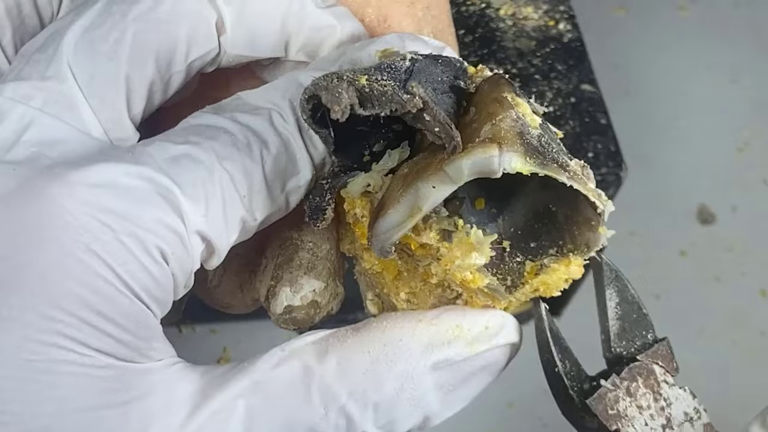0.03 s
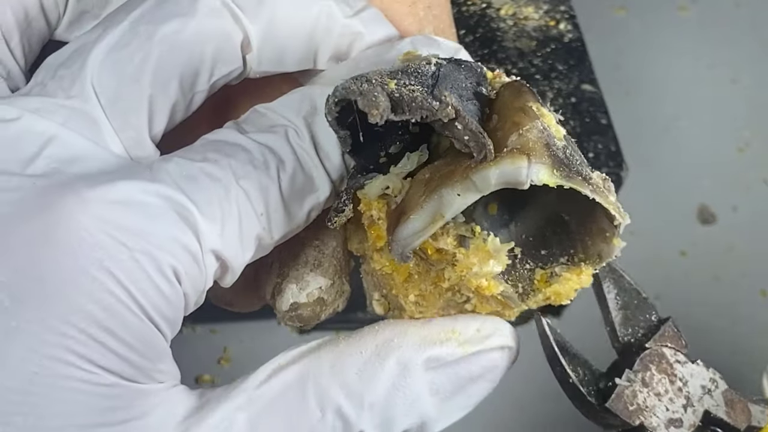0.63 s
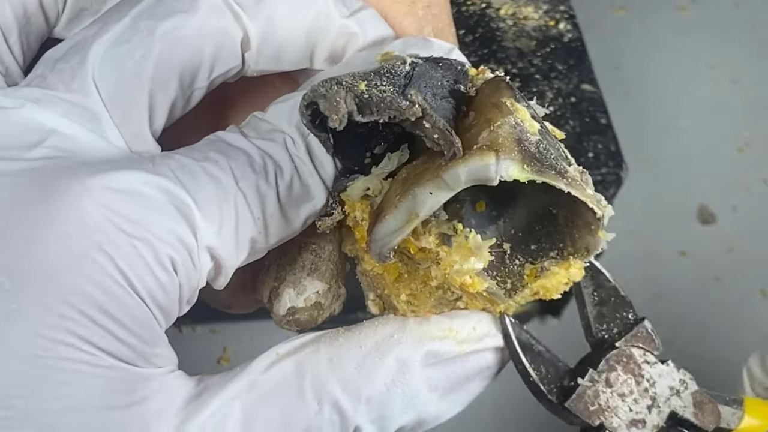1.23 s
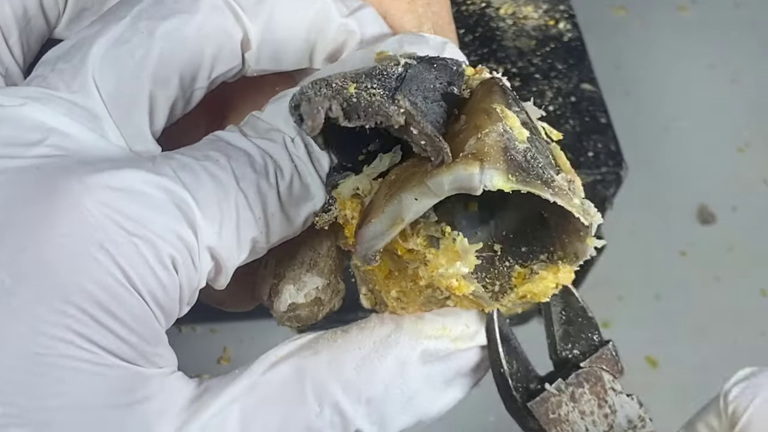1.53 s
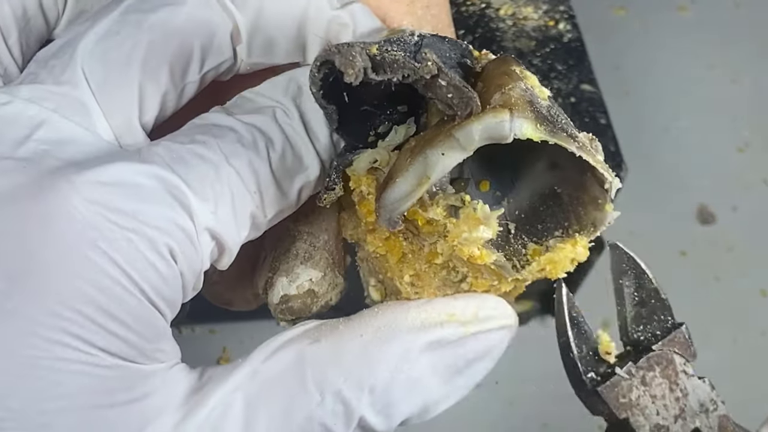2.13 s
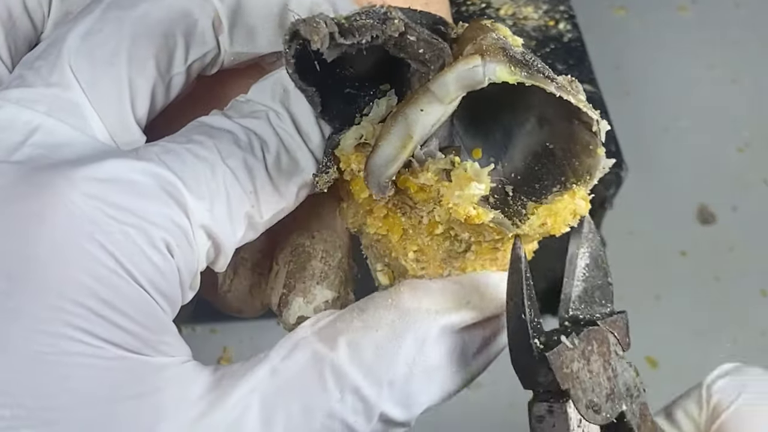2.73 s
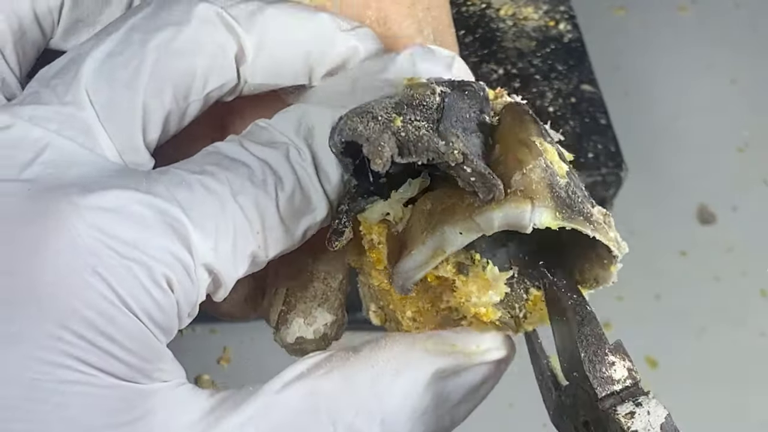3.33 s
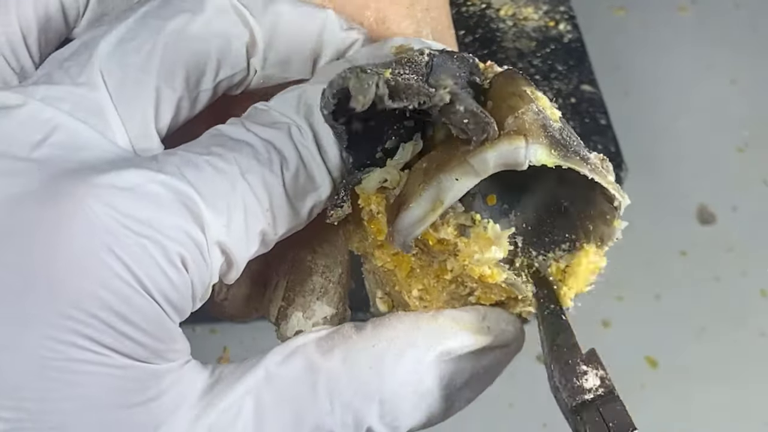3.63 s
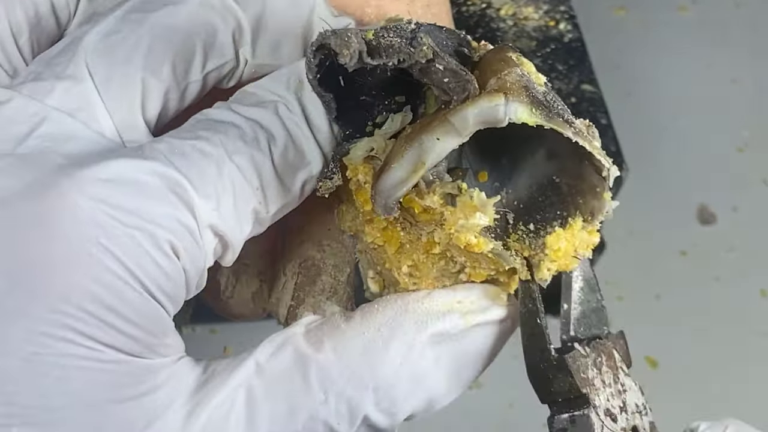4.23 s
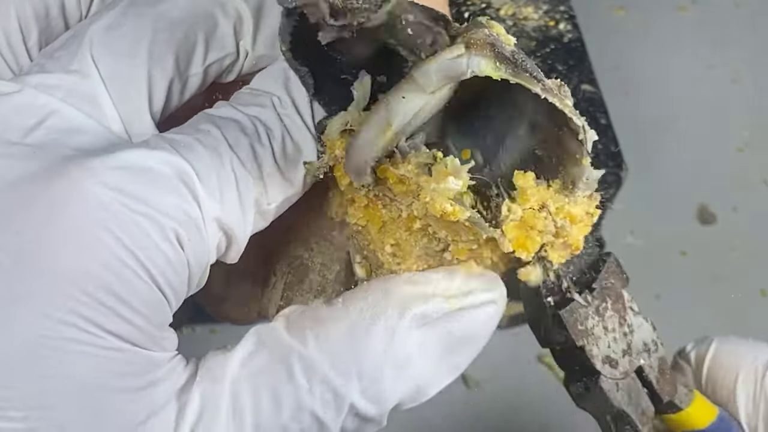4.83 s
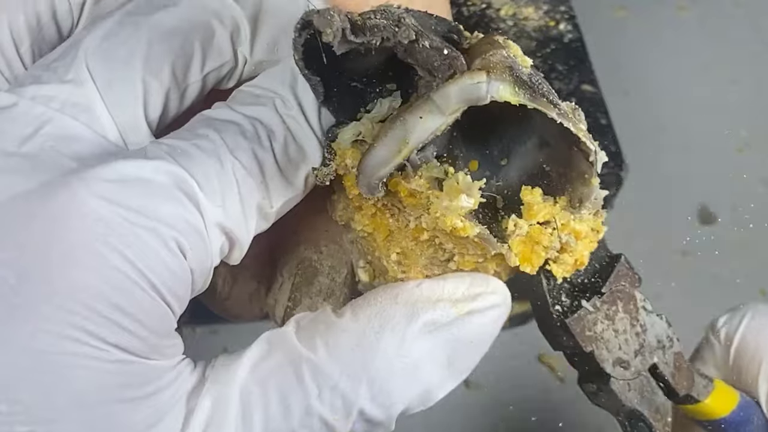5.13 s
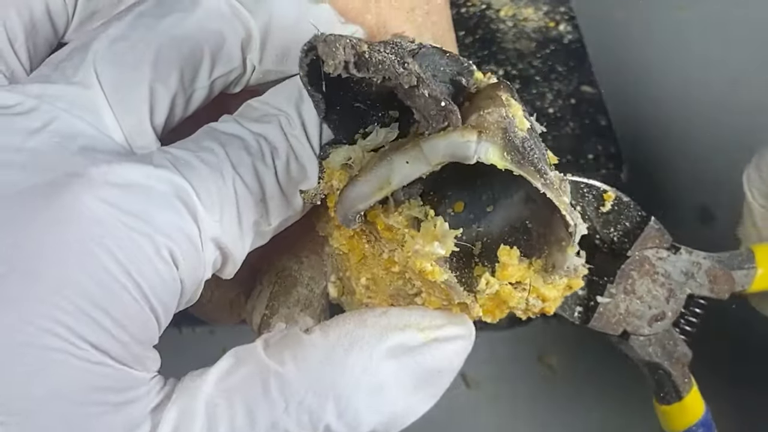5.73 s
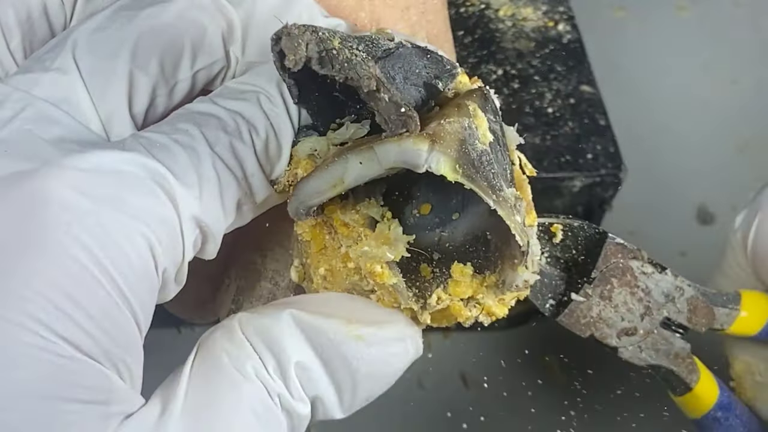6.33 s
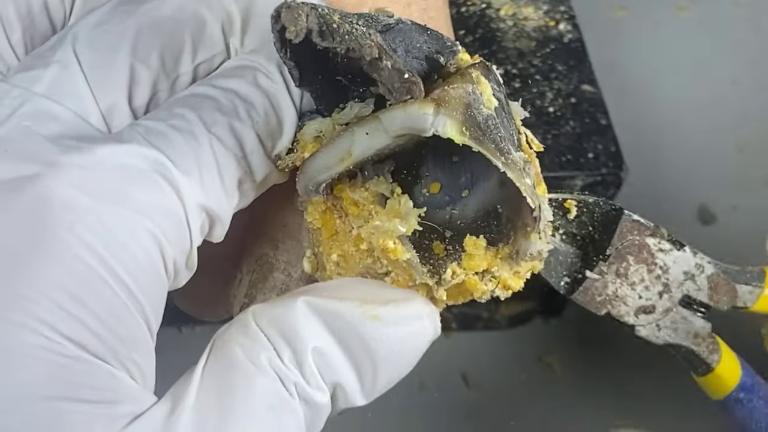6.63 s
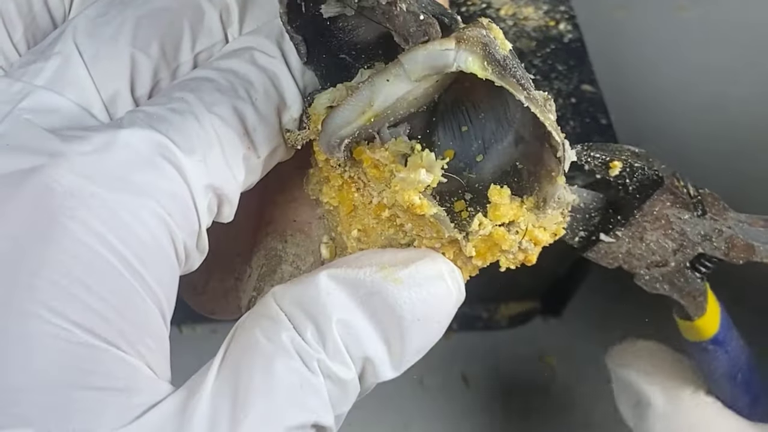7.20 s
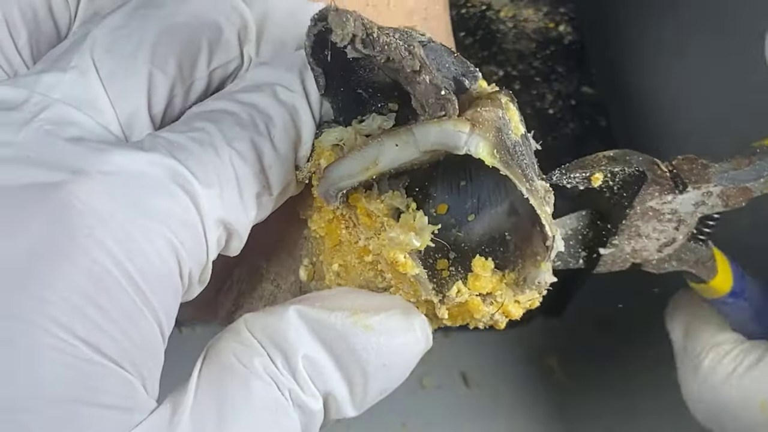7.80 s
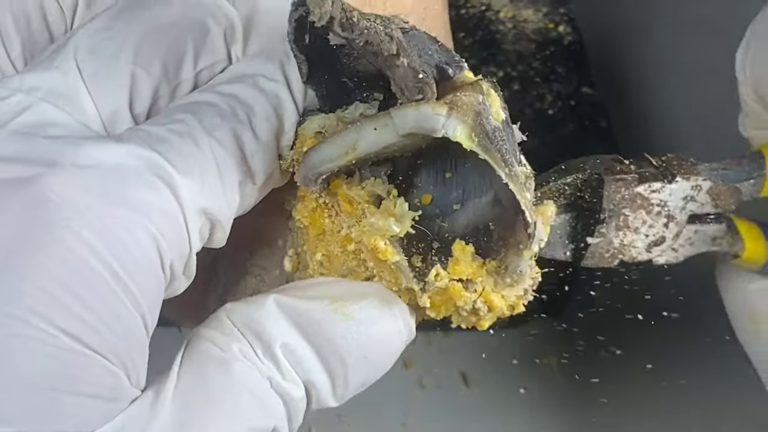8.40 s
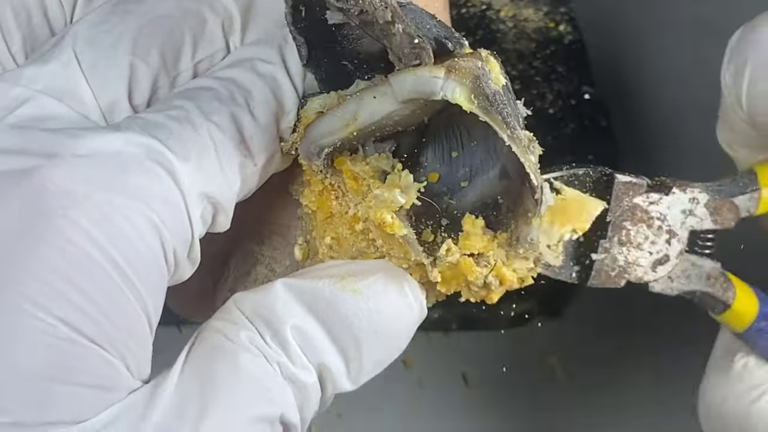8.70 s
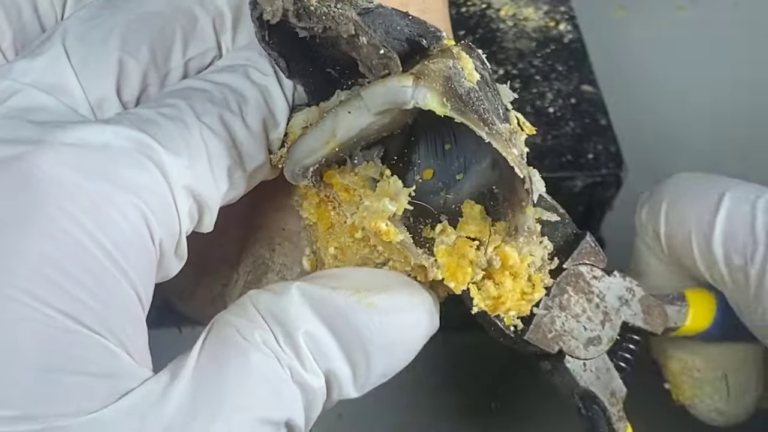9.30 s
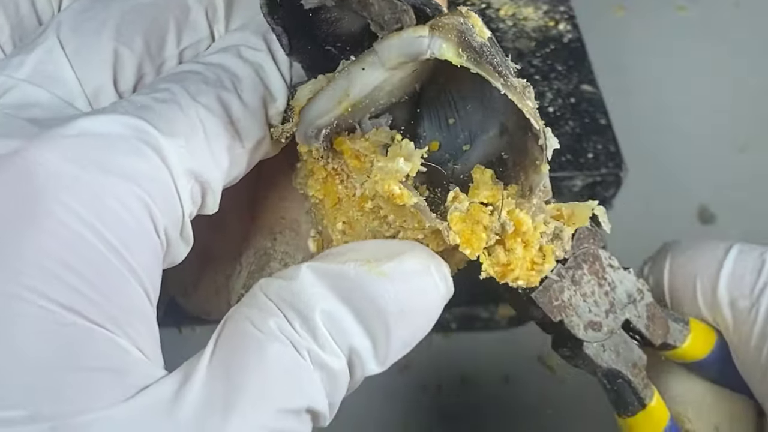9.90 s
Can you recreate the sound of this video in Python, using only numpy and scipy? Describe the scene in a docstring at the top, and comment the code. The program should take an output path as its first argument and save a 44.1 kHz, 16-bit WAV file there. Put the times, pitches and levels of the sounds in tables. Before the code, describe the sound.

Steel nippers cut a thick, hard toenail close to the microphone in a small room. Sharp, crackling snaps come every second or two, the loudest about halfway through, and a few end in a tiny metallic clink. Between cuts the blades tick and scrape on the nail, a glove rubs softly, and the jaws give one short creak near the end. A ventilation fan hums low throughout.

```python
"""Steel nippers cut a thick, hard toenail close to the microphone.
Each cut is a quick run of fractures that ring the jaws and the nail; after some cuts the blades clash.
Between cuts the blades scrape, tick, judder and creak on the nail, and a gloved hand shifts its grip.
The small room adds a short echo, and a ventilation fan hums throughout."""
import sys
import numpy as np
from scipy import signal
from scipy.fft import rfft, irfft, next_fast_len
from scipy.io import wavfile
from scipy.ndimage import map_coordinates

SR = 44100
rng = np.random.default_rng(int(sys.argv[2]) if len(sys.argv) > 2 else 0)


def transcribe(signal):
    """Save signal, clipped to [-1, 1], as a 16-bit WAV file at the path in sys.argv[1]."""
    frames = np.atleast_2d(signal).T
    limited = np.clip(frames, -1, 1)
    pcm = np.round(limited * 32767).astype(np.int16)
    wavfile.write(sys.argv[1], SR, pcm)


N = 438794
TIME = np.arange(N) / SR
SIDES = np.array([[1], [-1]]) / 2  # plus half on the left, minus half on the right


def amp(db):
    """Turn decibels into a gain."""
    return 10 ** (np.asarray(db) / 20)


def unit(x):
    """Scale a signal to an average (rms) level of 1."""
    return x / np.sqrt(np.mean(x ** 2) + 1e-20)


def along(points, hz):
    """Read between (frequency, value) points on a log frequency axis."""
    freqs, values = np.transpose(points)
    return np.interp(np.log(hz + 1), np.log(freqs + 1), values)


def wobble(rate):
    """A smooth curve through `rate` random values a second."""
    return map_coordinates(rng.standard_normal(int(N * rate / SR) + 4), [TIME * rate])


def swell(middle, half):
    """A bell-shaped rise and fall; both settings are in seconds."""
    return np.exp(-np.minimum(((TIME - middle) / half) ** 2, 100) / 2)


def add(track, s, sound):
    """Lay a sound into a track at s seconds."""
    start = round(s * SR)
    track[start:start + len(sound)] += sound[:N - start]


def filtered(x, response):
    """Change the strength and phase of each frequency by response(hz)."""
    n = x.shape[-1]
    padded = next_fast_len(n + n // 8, True)
    hz = np.fft.rfftfreq(padded, 1 / SR)
    return irfft(rfft(x, padded) * response(hz), padded)[..., :n]


def ring(x, modes):
    """Shake a body with x: it rings at its modes, the pitches it favours."""
    def response(f):
        return sum((-1) ** k * amp(db) * 1j * f * width / (hz * hz - f * f + 1j * f * width)
                   for k, (hz, width, db) in enumerate(modes))
    return filtered(x, response)


def burst(modes, rise, span):
    """A brief tear peaks at `rise` seconds and rings a body, with the energy of `span` seconds at rms 1."""
    t = np.arange(SR // 40) / SR
    tear = rng.standard_normal(len(t)) * (t / rise) ** 2 * np.exp(-2 * t / rise)
    sound = ring(tear, modes)
    return sound / np.linalg.norm(sound) * np.sqrt(span * SR)


def ping(modes, span):
    """A sudden release: the modes swell and die quickly, with the energy of `span` seconds at rms 1."""
    sound = ring(ring(signal.unit_impulse(SR // 40), modes), modes)
    return sound / np.linalg.norm(sound) * np.sqrt(span * SR)


# how alike left and right are: (frequency [Hz], likeness [0 to 1])
LIKENESS = [(60, 0.54), (130, 0.79), (290, 0.67), (640, 0.044), (1400, 0.028), (2400, 0.81), (4000, 0.98),
            (15000, 1)]
def diffuse(pair):
    """Blend two unrelated signals into sound that arrives from all sides."""
    def shares(hz):
        angle = np.arccos(np.clip(along(LIKENESS, hz), -1, 1)) / 2
        return np.array([np.cos(angle), np.sin(angle)])
    mid, side = filtered(pair, shares)
    return np.array([mid + side, mid - side])


# the fan's tones: (pitch [Hz], level [dB], waver [dB], left over right [dB])
HUM_TONES = [(65.93, -18.6, .3, 1.65), (197.85, -35, 2, 5)]
def fan_hum():
    """The fan hums deeply, wavering a little in level and pitch."""
    hum = np.zeros((2, N))
    for hz, db, waver, pan in HUM_TONES:
        gain = np.sqrt(2) * amp(db + waver * wobble(7) + SIDES * pan)
        hum += gain * np.sin(2 * np.pi * hz * TIME + waver / 12 * wobble(3))
    return hum


# the tone colour of moving air: (frequency [Hz], relative level [dB])
AIR_COLOUR = [(15, -67), (45, 3), (85, 7), (165, -9), (310, -2.4), (500, -7.5), (850, -10), (1400, -16),
              (2000, -18), (2600, -19.5), (3200, -25.5), (4000, -27), (4700, -29.5), (7000, -37),
              (12000, -41.5), (15500, -43.5)]
# the air duct's modes: (pitch [Hz], width [Hz], relative level [dB])
DUCT_MODES = [(101.2, 6.2, -1.5), (110.3, 7.3, -0.5), (134.3, 7.2, -5), (198.7, 6.8, -2), (265.8, 6, -4),
              (298, 8.2, -13), (337.4, 6, -10.5), (400.5, 4.7, -7.5), (601.6, 7.5, -11.5)]
def fan_air(air_db, duct_db, ripple_db=2.3, ripple_step_hz=16, echo_s=.00379, echo_share=.14):
    """Air rushes through a ringing duct, a little to the left."""
    def colour(hz):
        # the room's standing waves ripple the colour, and one close reflection joins in
        ripple = np.interp(hz / ripple_step_hz, np.arange(SR // 20), rng.standard_normal(SR // 20))
        reflection = echo_share * np.exp(-2j * np.pi * hz * echo_s)
        return amp(along(AIR_COLOUR, hz) + ripple_db * ripple) * (1 + reflection)
    air = unit(filtered(rng.standard_normal((2, N)), colour))
    duct = unit(ring(rng.standard_normal((2, N)), DUCT_MODES))
    waver_db = .25 * wobble(2.75) + .35 * wobble(14)
    rush = diffuse(amp(air_db + waver_db) * air + amp(duct_db) * duct)
    left_over_right_db = [(100, 6.0), (220, 2.6), (1300, 3.7), (4400, .2)]
    return filtered(rush, lambda hz: amp(SIDES * along(left_over_right_db, hz)))


# the fan's whistles: (pitch [Hz], middle time [s], half length [s], relative level [dB])
WHISTLES = [(883, .8, .5, -52), (883, 2.4, .3, -51), (883, 3.15, .2, -45), (786, 6.15, .45, -47)]
def fan_whistles(gain_db):
    """Faint, unsteady whistles come and go."""
    out = np.zeros(N)
    for hz, s, half, db in WHISTLES:
        gain = amp(db + gain_db + 1.2 * wobble(4.22)) * swell(s, half)
        out += gain * np.sin(2 * np.pi * hz * TIME + 0.79 * wobble(12))
    return out


# blade strokes: (middle time [s], half length [s], level [dB], jaw and crumb boost [dB])
STROKES = [(.448, .025, -57, -8), (1.49, 0.047, -55, -10), (3.555, 0.014, -38, 0),
           (3.685, 0.015, -31.5, -8), (3.764, .023, -55, 0), (6.037, 0.007, -47.5, -1),
           (6.143, .014, -52, -14), (6.28, 0.01, -38, -5), (7.565, 0.058, -51, -4), (8.153, 0.0025, -44, 0),
           (8.211, 0.036, -52.5, -6), (8.338, .003, -39, 2), (9.538, 0.0095, -44.5, 6.5)]
# modes of cracking nail, jaws and nail crumbs: (pitch [Hz], width [Hz], relative level [dB])
CRACK_MODES = [(4730, 1200, -3), (6950, 1700, 1), (9800, 2100, 1.5), (11730, 1700, -2), (13900, 2100, -1.5)]
JAW_MODES = [(5720, 1100, 1)]
CRUMB_MODES = [(2470, 530, 1), (3200, 510, 1.5), (4200, 1500, -0.5)]
def scrapes(grain_db, crumb_db, jaw_db):
    """The blade shaves crumbly nail: countless tiny breaks swell and fade with each stroke."""
    crack_gain, body_gain = np.zeros((2, N))
    for s, half, db, body_db in STROKES:
        stroke = amp(db) * swell(s, half)
        crack_gain += stroke
        body_gain += stroke * amp(body_db)
    grains = rng.standard_normal((3, N)) * amp(grain_db * wobble(700))
    cracks = unit(ring(grains[0], CRACK_MODES))
    jaws = amp(jaw_db) * unit(ring(grains[1], JAW_MODES))
    crumbs = amp(crumb_db) * unit(ring(grains[2], CRUMB_MODES))
    return crack_gain * cracks + body_gain * (jaws + crumbs)


# touches of the blade tips: (time [s], relative level [dB])
TOUCHES = [(1.4481, -31), (2.768, -38), (2.83, -37), (3.0653, -29.5), (3.283, -41.5), (3.558, -27),
           (3.935, -41.5), (4.09, -41), (4.845, -36), (5.9482, -36), (5.9577, -33), (5.9652, -31),
           (5.9752, -29.5), (6.1512, -33), (6.2245, -28), (6.2845, -26.5), (6.8269, -37), (6.985, -29.5),
           (7.11, -37), (7.549, -38), (7.566, -33), (7.574, -37), (7.6, -38), (7.608, -39), (7.644, -30.5),
           (7.7138, -27), (7.7215, -34), (7.777, -35), (7.87, -30.5), (8.149, -21.5), (8.219, -35),
           (8.7535, -32.5), (8.87, -39), (9.183, -37.5), (9.5184, -32), (9.5397, -27.5)]
def ticks(crack_db, jaw_db, catches_per_stroke=3, catch_db=-39.5):
    """Tiny bright clicks: the tips touch the nail, or the edge catches during a stroke."""
    catches = [(s + half * offset, catch_db)
               for s, half, *_ in STROKES for offset in rng.standard_normal(catches_per_stroke)]
    out = np.zeros(N)
    for s, db in list(TOUCHES) + catches:
        add(out, s, amp(db + crack_db) * burst(CRACK_MODES, rise=0.0007, span=0.0046))
        add(out, s, amp(db + jaw_db) * ping(JAW_MODES, span=0.0015))
    return out


# breaks in the nail: (time [s], crack [dB], edge ring [dB], jaw ring [dB], jaw pitch [Hz],
# piece ring [dB], piece pitch [Hz], hollow ring [dB], toe knock [dB], foot thud [dB])
FRACTURES = [(1.8028, -24.5, -30, -33, 6030, -42, 3980, -50, -48, -38),
             (1.8057, -28, -31, -25, 5300, -34, 2580, -44, -49, -37),
             (1.8078, -21.5, -26, -25.5, 6450, -27, 3210, -45, -40, -40.5),
             (1.8093, -29, -23, -19.5, 5400, -20.5, 2580, -41, -38, -35),
             (3.4858, -28, -39, -41, 6000, -37, 3300, -48, -43, -35),
             (3.4904, -28, -46, -25, 5200, -22.5, 3330, -50, -42, -33),
             (3.6679, -28, -30, -36, 5600, -32, 3500, -50, -45, -44),
             (3.6706, -28, -32, -33, 6300, -34, 3040, -48, -45, -43),
             (3.7013, -19.5, -33, -14.5, 5560, -38, 2260, -45, -37, -34),
             (4.6986, -29, -45, -28, 6300, -23, 2560, -50, -40, -46),
             (4.707, -34, -45, -32, 6300, -27, 2520, -52, -44, -48),
             (4.9022, -14, -21, -19, 5650, -24, 2700, -28, -23, -31),
             (4.9056, -15, -17, -20, 5250, -13.5, 2470, -18.5, -24, -28.5),
             (4.9075, -21, -24, -17, 5600, -18, 2820, -22, -27, -27),
             (4.9102, -8.5, -13, -15.5, 5730, -19, 2480, -29, -30, -27),
             (4.9131, -19, -23.5, -21, 5200, -24, 2360, -25, -27, -25),
             (4.9173, -13.5, -13, -10, 5570, -23, 2390, -26, -31.5, -24),
             (6.207, -27, -25, -32, 6800, -23, 3380, -41, -31, -41),
             (6.2094, -19.5, -23, -25, 4300, -19.5, 2580, -33, -18, -42),
             (6.2135, -21, -17.5, -28, 5040, -32, 3700, -36, -23, -44),
             (8.3353, -36, -44, -41, 5700, -39, 3280, -44, -38, -40),
             (8.3411, -24, -34, -35, 5600, -36, 2500, -42, -36, -32),
             (8.343, -23, -34, -26, 5600, -24.5, 3630, -38, -30.5, -31),
             (8.3463, -25, -37, -19, 5570, -30, 3170, -40, -34, -31),
             (8.3505, -31, -47, -26, 5660, -36, 2480, -42, -34, -31),
             (9.7367, -31.5, -49, -18.5, 5800, -24, 2460, -44, -36, -36)]
# modes of the piece that breaks off: (pitch [times piece pitch], width [Hz], relative level [dB])
PIECE_MODES = [(1, 560, 19), (1.25, 900, -10), (1.6, 1120, 0.5)]
# modes of the cutting edges, hollow nail, toe and foot: (pitch [Hz], width [Hz], relative level [dB])
EDGE_MODES = [(12550, 2400, 0)]
HOLLOW_MODES = [(1760, 200, 1), (2410, 260, -2), (3020, 240, -4)]
TOE_MODES = [(1104, 156, -1.5), (1284, 113, 1), (1684, 100, -6)]
FOOT_MODES = [(512, 120, 4), (790, 290, -0.5)]
def snaps(jaw_width_hz, fibre_db=-8, fibre_lead_s=.002):
    """Each fracture cracks, rings the steel and the nail, knocks the toe and jolts the foot."""
    out = np.zeros(N)
    for s, crack_db, edge_db, jaw_db, jaw_hz, piece_db, piece_hz, hollow_db, toe_db, foot_db in FRACTURES:
        piece = [(multiple * piece_hz, width, db) for multiple, width, db in PIECE_MODES]
        add(out, s, amp(crack_db) * burst(CRACK_MODES, rise=0.00051, span=0.0011))
        add(out, s, amp(edge_db) * ping(EDGE_MODES, span=0.0008))
        add(out, s, amp(jaw_db) * ping([(jaw_hz, jaw_width_hz, 0)], span=0.0015))
        add(out, s, amp(piece_db) * ping(piece, span=0.00088))
        add(out, s, amp(hollow_db) * ping(HOLLOW_MODES, span=0.0021))
        add(out, s, amp(toe_db) * burst(TOE_MODES, rise=0.00041, span=0.0026))
        add(out, s, amp(foot_db) * burst(FOOT_MODES, rise=0.00041, span=0.0037))
        # fibres start to give way just before the break
        fibres = burst(CRACK_MODES, rise=0.0024, span=0.0022)
        add(out, s - fibre_lead_s, amp(crack_db + fibre_db) * fibres)
    return out


# the blades meet after a clean cut: (time [s], level [dB], pitch [Hz])
CLASHES = [(3.7009, -30, 5560), (8.3463, -32, 5350), (9.7366, -34, 5690)]
# modes of the steel: (pitch [times clash pitch], relative level [dB])
STEEL_MODES = [(.955, -4), (1, 0), (1.05, -4), (1.82, -7)]
def clashes(ring_s):
    """The blades meet and the steel sings; the hand damps it by 60 dB in ring_s seconds."""
    out = np.zeros(N)
    t = np.arange(SR // 8) / SR
    for s, db, hz in CLASHES:
        for multiple, mode_db in STEEL_MODES:
            fade = amp(db + mode_db - 60 * t / ring_s)
            add(out, s, fade * np.sin(2 * np.pi * multiple * hz * t))
    return out


# shifts of the hand: (middle time [s], half length [s], level [dB])
GRIP_SHIFTS = [(5.55, 0.027, -45), (5.974, 0.03, -44.5), (7.25, .1, -51.5), (9.05, 0.11, -48),
               (9.273, 0.058, -43.5)]
# modes of the rubbing glove: (pitch [Hz], width [Hz], relative level [dB])
GLOVE_MODES = [(1900, 800, 0.5), (2820, 700, -1), (4370, 1400, -7)]
def glove_rustle(grain_db):
    """The glove rubs in soft, dull swells as the grip changes."""
    gain = sum(amp(db) * swell(s, half) for s, half, db in GRIP_SHIFTS)
    rubbing = rng.standard_normal(N) * amp(grain_db * wobble(130))
    return gain * unit(ring(rubbing, GLOVE_MODES))


# one judder of the jaws: (middle time [s], half length [s], level [dB])
JUDDER = (6.283, 0.011, -33.5)
# modes of nail and steel together: (pitch [Hz], width [Hz], relative level [dB])
JUDDER_MODES = [(2460, 520, 0), (5780, 660, -1)]
def judder(grain_db):
    """The closed jaws chatter over the cut edge, short and gritty, ringing nail and steel."""
    s, half, db = JUDDER
    grit = rng.standard_normal(N) * amp(grain_db * wobble(450))
    ringing = ring(ring(grit, JUDDER_MODES), JUDDER_MODES)
    return amp(db) * swell(s, half) * unit(ringing)


# the course of one slow bite: (time [s], relative level [dB], slip rate [per s])
SLOW_BITE = [(7.701, -62, 86), (7.74, -37, 130), (7.775, -43, 200), (7.8, -45, 330), (7.866, -40.5, 370),
             (7.895, -68, 150)]
# modes of the clamped jaws: (pitch [Hz], width [Hz], relative level [dB])
CLAMPED_MODES = [(3660, 350, -6), (4800, 300, -5), (6400, 150, 0), (7000, 200, -8), (7950, 400, -7),
                 (9930, 250, -6), (11100, 250, -8), (13500, 400, -22)]
def creak(uneven, gain_db):
    """The jaws stick and slip at an uneven rate as they bite; every slip rings them."""
    times, db, rates = np.transpose(SLOW_BITE)
    rate = np.interp(TIME, times, rates) * np.exp(uneven * wobble(150))
    slip_count = np.floor(np.cumsum(rate) / SR)
    slips = np.diff(slip_count, prepend=0) * amp(3 * wobble(200) + 1.5 * wobble(45))
    gain = amp(np.interp(TIME, times, db, left=-120, right=-120) + gain_db)
    return gain * unit(ring(slips, CLAMPED_MODES))


# what the walls give back: (frequency [Hz], relative level [dB])
WALL_COLOUR = [(500, 12), (3000, 6.5), (5700, -10.5), (9000, -9), (14000, -7)]
# how long the room rings: (frequency [Hz], time to fade by 60 dB [s])
ROOM_FADE = [(300, 0.1), (2500, 0.14), (6000, 0.29), (14000, 0.24)]
def room_echo(x, near_db, tail_db, near_fade_s, wall_delay_s=.011):
    """Hands and table scatter the sound at once; the walls answer with a short tail."""
    hz, t, noise = signal.stft(rng.standard_normal((2, SR // 2)), SR, nperseg=256)
    fade = amp(along(WALL_COLOUR, hz)[:, None] - 60 * t / along(ROOM_FADE, hz)[:, None])
    _, tail = signal.istft(noise * fade, SR, nperseg=256)
    t = np.arange(tail.shape[1]) / SR
    tail *= 1 - np.exp(-np.maximum(t - wall_delay_s, 0) / 0.00088)
    near = rng.standard_normal(tail.shape) * amp(-60 * t / near_fade_s) * (t > .001)
    near *= amp(near_db) / np.linalg.norm(near[0])
    tail *= amp(tail_db) / np.linalg.norm(tail[0])
    return signal.fftconvolve(x[None], diffuse(near + tail), axes=1)[:, :N]


def scene():
    """The nippers close by, their echo, and the fan."""
    nippers = (snaps(jaw_width_hz=1020) + clashes(ring_s=0.089) + ticks(crack_db=-9, jaw_db=-14.5)
               + scrapes(grain_db=5, crumb_db=2, jaw_db=-4) + judder(grain_db=3)
               + creak(uneven=0.8, gain_db=-5.5) + glove_rustle(grain_db=4))
    echo = room_echo(nippers, near_db=-10.5, tail_db=-10, near_fade_s=0.054)
    fan = fan_hum() + fan_air(air_db=-30, duct_db=-30.5) + fan_whistles(gain_db=5)
    return nippers + echo + fan


# how far the left side runs ahead of the right: (frequency [Hz], phase [radians])
LEFT_LEAD = [(20, 0), (2600, 0), (4000, -.4), (5900, -.8), (6800, -.3), (7600, 2), (9000, 3.14),
             (10500, 4.5), (12000, 6.1), (13500, 7.5), (15000, 9.3)]
def record(dry, ceiling=.9, top_hz=15750):
    """Left and right part in phase in the treble, peaks are rounded off and the highest sound is cut."""
    stereo = filtered(dry, lambda hz: np.exp(1j * along(LEFT_LEAD, hz) * SIDES))
    rounded = stereo / (1 + np.abs(stereo / ceiling) ** 6) ** (1 / 6)
    return filtered(rounded, lambda hz: hz < top_hz)


dry = scene()
out = record(dry)
transcribe(out)
```